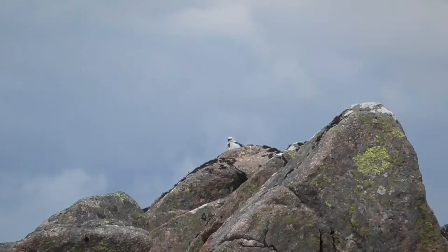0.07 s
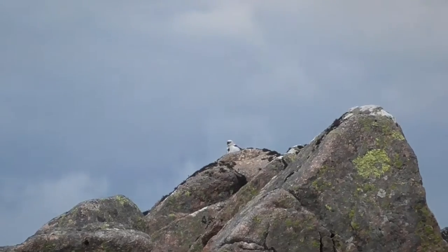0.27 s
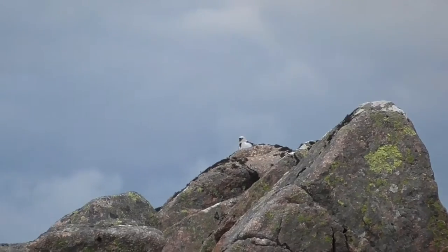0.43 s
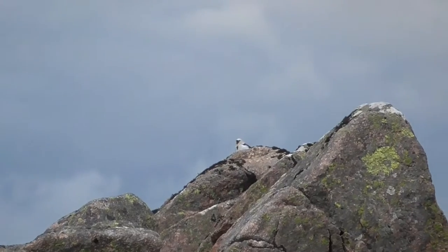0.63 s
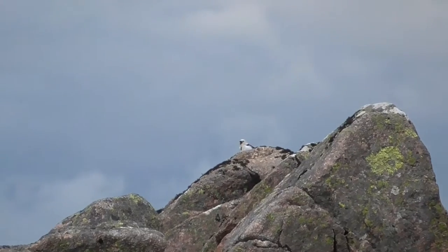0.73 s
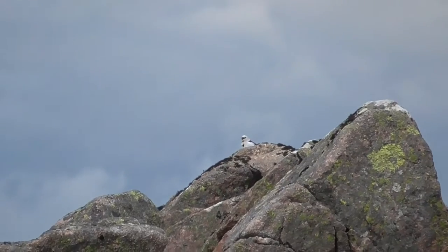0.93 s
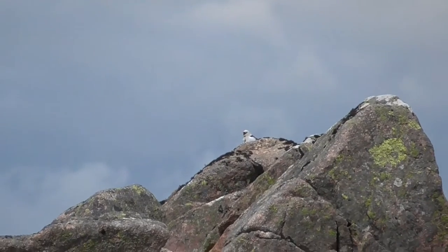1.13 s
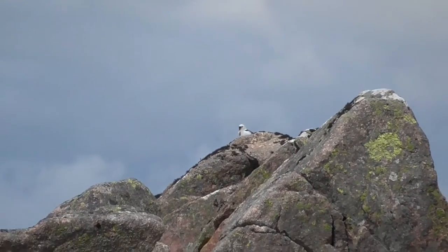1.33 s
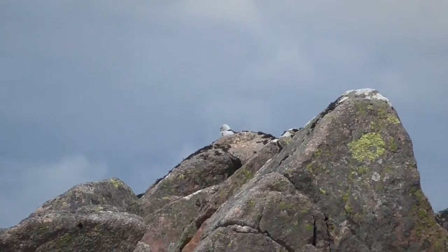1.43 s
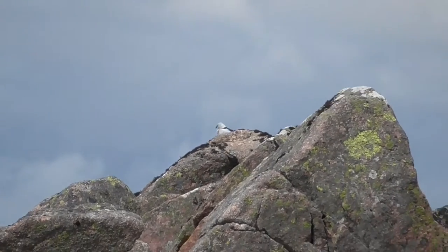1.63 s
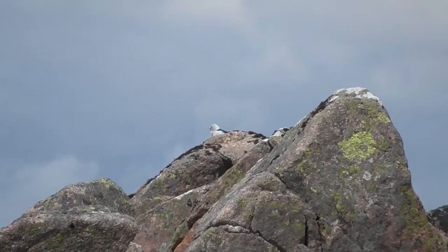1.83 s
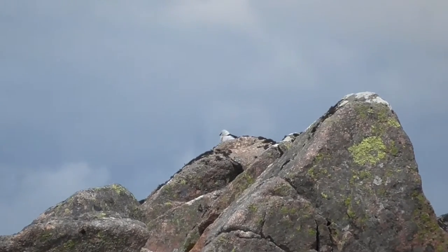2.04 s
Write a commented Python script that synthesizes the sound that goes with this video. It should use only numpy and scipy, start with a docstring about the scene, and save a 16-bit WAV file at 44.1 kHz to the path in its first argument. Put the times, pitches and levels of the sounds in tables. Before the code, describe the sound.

A small bird sings a quick run of high chirps, gliding whistles and scratchy trilled notes on an open mountain. Uneven wind gusts rumble and thump on the microphone throughout, with faint handling clicks early on.

```python
"""On a windy mountain, a snow bunting sings from a rock: quick chips, gliding whistles, slurs and
notes that open with a quaver. Its syrinx is a harmonic source, filtered by throat and beak, and the
rocks scatter a trace of the song. Turbulent gusts rumble and thump on the microphone, and the handled
camera clicks faintly, all over a steady hiss."""
import sys
import numpy as np
from scipy import signal
from scipy.fft import rfft, irfft
from scipy.io import wavfile
from scipy.ndimage import uniform_filter1d

SR = 44100
rng = np.random.default_rng(int(sys.argv[2]) if len(sys.argv) > 2 else 0)


def transcribe(u):
    """Save the signal u as a 16-bit wav file named by the first command-line argument.

    u: samples, shape (n,) or (channels, n), limited to [-1, 1]; the rate is SR.
    q: integer samples, one column per channel.
    """
    v = np.clip(np.atleast_2d(u).T, -1, 1)
    q = np.round(v * 32767).astype(np.int16)
    wavfile.write(sys.argv[1], SR, q)


N = 92610


def amp(db):
    """The decibel scale: 20 dB is a tenfold amplitude."""
    return 10 ** (np.asarray(db) / 20)


def unit(x):
    """Normalisation to an rms of 1."""
    return x / np.sqrt(np.mean(x ** 2) + 1e-20)


def add(mix, start, sound):
    """Superposition: a sound adds to the mix from its start [s]."""
    part = mix[max(round(start * SR), 0):][:len(sound)]
    part += sound[:len(part)]


def level_at(spectrum, hz):
    """Interpolation of a spectrum's level [dB] over log frequency."""
    f, db = np.transpose(spectrum)
    return np.interp(np.log(hz + 1), np.log(f + 1), db)


def noise(spectrum):
    """Spectral shaping of white noise, at an rms of 1."""
    gain = amp(level_at(spectrum, np.fft.rfftfreq(N, 1 / SR)))
    return unit(irfft(rfft(rng.standard_normal(N)) * gain, N))


def wander(rate_hz):
    """Random modulation: low-passed noise at an rms of 1."""
    f = np.fft.rfftfreq(N, 1 / SR)
    return unit(irfft(rfft(rng.standard_normal(N)) * np.exp(-(f / rate_hz) ** 2), N))


def edges(t, edge_s):
    """Quarter-sine tapers limit spectral splatter at both ends of a sound."""
    attack = np.sin(np.pi / 2 * np.clip(t / edge_s, 0, 1))
    release = np.sin(np.pi / 2 * np.clip((t[-1] - t) / edge_s, 0, 1))
    return attack * release


# Hiss spectra, in phase and in antiphase at the two ports (frequency [Hz], relative level [dB])
HISS_MID_SPECTRUM = [(100, 19.5), (1500, 11.5), (2500, 1), (5000, -3), (6000, -7.5), (7500, -3.5),
                     (11000, 0), (13000, -3.5), (15700, -2.5)]
HISS_SIDE_SPECTRUM = [(1000, -4), (2500, -11), (12000, 0.5), (15700, -13.5)]
def hiss():
    """Stationary noise: a weak antiphase part slightly decorrelates the channels."""
    mid = noise(HISS_MID_SPECTRUM)
    side = amp(-25.5) * noise(HISS_SIDE_SPECTRUM)
    return amp(-63) * np.array([mid + side, mid - side])


# Three bands of turbulence (frequency [Hz], relative level [dB])
RUMBLE_SPECTRUM = [(20, -26.5), (32, -20), (50, -18), (75, -9), (105, -4), (150, -9), (220, -18.5),
                   (600, -95)]
BUFFET_SPECTRUM = [(80, -64.5), (170, 2), (300, -5), (450, -13), (700, -33.5), (2500, -110)]
FLUTTER_SPECTRUM = [(200, -33.5), (380, -1.5), (520, -1), (750, -4.5), (1100, -16), (1450, -19.5),
                    (1750, -36.5), (2500, -36), (5000, -55.5)]
# Gust envelopes before capping and scaling (time [s], rumble [dB], buffet [dB], flutter [dB])
GUST_LEVELS = [(0.017, -36.5, -43, -59), (0.035, -34, -39, -42.5), (0.221, -37, -39, -48),
               (0.253, -22.5, -31, -47.5), (0.288, -47, -39, -45.5), (0.327, -25.5, -21.5, -37.5),
               (0.358, -35, -37.5, -46), (0.41, -31, -31, -51), (0.482, -40.5, -37.5, -48.5),
               (0.512, -21, -19, -27.5), (0.567, -18, -28, -48), (0.614, -30, -30.5, -52.5),
               (0.682, -44, -49, -58.5), (0.712, -38.5, -32.5, -49.5), (0.752, -33, -48.5, -65.5),
               (0.909, -65, -62, -67), (0.95, -23, -38, -54), (1.008, -21.5, -24, -53.5),
               (1.068, -51, -57.5, -62), (1.16, -50, -50, -58), (1.198, -30, -32.5, -49),
               (1.26, -41.5, -52, -61), (1.322, -46, -45, -52.5), (1.349, -29.5, -34.5, -51),
               (1.452, -28, -23.5, -44.5), (1.53, -38, -49, -60), (1.552, -55, -30.5, -41),
               (1.571, -24.5, -34, -50.5), (1.608, -54, -45, -55.5), (1.682, -30, -32, -46),
               (1.7, -33, -26, -43.5), (1.735, -30, -41.5, -47), (1.782, -34.5, -28, -47),
               (1.99, -33.5, -43.5, -54), (2.03, -38.5, -51, -56), (2.1, -32, -40.5, -53.5)]
def wind(lean_db=0.4):
    """Turbulent pressure on the microphone: gusts modulate three noise bands over a calm rumble."""
    times, rumble_db, buffet_db, flutter_db = np.transpose(GUST_LEVELS)
    t, lumps = np.arange(N) / SR, wander(73.6)

    def envelope(db, cap_db):
        return amp(np.minimum(np.interp(t, times, db), cap_db))

    rumble = np.hypot(amp(-1) * envelope(rumble_db, cap_db=-25), amp(-46.5))  # gust and calm powers add
    buffet = envelope(buffet_db, cap_db=-25) * unit(amp(5 * lumps))
    flutter = envelope(flutter_db, cap_db=-34) * unit(amp(4 * lumps))
    mid = rumble * noise(RUMBLE_SPECTRUM) + buffet * noise(BUFFET_SPECTRUM)
    mid += flutter * noise(FLUTTER_SPECTRUM) + eddy_thumps()
    side = amp(-18) * (rumble * noise(RUMBLE_SPECTRUM) + buffet * noise(BUFFET_SPECTRUM))
    side += amp(-24) * flutter * noise(FLUTTER_SPECTRUM)
    # The wind strikes the left port a little harder.
    return np.array([amp(lean_db) * (mid + side), amp(-lean_db) * (mid - side)])


# Overtones at the syrinx (harmonic number, relative level [dB])
HARMONICS = [(2, -13), (3, -14), (4, -17)]
# Resonance of throat and beak (frequency [Hz], gain [dB])
THROAT_RESPONSE = [(1800, -14), (2500, -9), (3000, -0.5), (3700, 3), (4500, -6), (5100, -15.5),
                   (6000, -27.5), (7500, -17), (9000, -18), (11200, -11), (12300, -21.5), (14000, -31)]
def syrinx(hz, envelope, main_hz, bright_db=0, jitter=0.004, shimmer_db=0):
    """Source and filter: a harmonic tone passes the throat, whose gain is normalised at main_hz."""
    phase = 2 * np.pi * np.cumsum(hz * (1 + jitter * wander(260)[:len(hz)])) / SR
    dulling_db = 10 * (np.arange(len(hz)) / SR / 0.11) ** 2  # overtones lose 10 dB by 0.11 s
    tone = amp(level_at(THROAT_RESPONSE, hz)) * np.sin(phase)
    for k, db in HARMONICS:
        gain = amp(db + bright_db - dulling_db + level_at(THROAT_RESPONSE, k * hz))
        tone += gain * (k * hz < SR / 2) * np.sin(k * phase)
    flicker_db = shimmer_db * wander(150)[:len(hz)]
    return np.sqrt(2) * envelope * amp(flicker_db - level_at(THROAT_RESPONSE, main_hz)) * tone


# Short arched notes (start [s], duration [s], first pitch [Hz], top pitch [Hz], last pitch [Hz],
# climb across the top [Hz], level [dB])
CHIP_NOTES = [(0.084, 0.013, 4300, 4440, 4500, 300, -59), (.099, 0.022, 3120, 3850, 2650, 250, -45),
              (0.538, 0.029, 2600, 3010, 3020, 105, -45), (0.68, 0.0084, 2870, 4360, 3100, 0, -66),
              (0.722, 0.028, 2280, 3090, 2750, 755, -40.5), (0.9594, 0.024, 2590, 3785, 2580, -5, -38),
              (0.982, 0.019, 3040, 4180, 2480, 92, -41.5), (1.0027, 0.01, 3000, 4460, 2300, -1, -50.5),
              (1.074, 0.026, 4220, 4520, 3870, 550, -47.5), (1.096, 0.0209, 3140, 3897, 2650, 100, -35),
              (1.1106, 0.025, 4160, 3690, 3530, -300, -48), (1.43, 0.026, 2490, 2990, 2790, 202, -43),
              (1.518, 0.015, 3600, 3600, 2960, 350, -41), (1.537, 0.024, 2320, 2920, 2480, 552, -43.5),
              (1.564, 0.018, 3400, 3610, 3050, 403, -38), (1.578, 0.015, 2960, 3930, 3030, 300, -40.5),
              (1.592, 0.011, 3150, 4390, 3460, -200, -44.5), (1.810, 0.021, 4000, 4300, 4650, 245, -61),
              (1.826, 0.025, 3230, 3730, 2520, 147, -50)]
def chips(scoop_s=0.00322, hook_s=0.00291, arch_db=8):
    """Rapid frequency sweeps: each chip scoops onto a tilted plateau and hooks away at the end."""
    out = np.zeros(N)
    for start, length, first_hz, top_hz, last_hz, climb_hz, db in CHIP_NOTES:
        t = np.arange(0, length, 1 / SR)
        progress = t / length
        plateau = top_hz + climb_hz * (progress - .5)
        scoop = (first_hz - plateau[0]) * np.exp(-(t / scoop_s) ** 1.53)
        hook = (last_hz - plateau[-1]) * np.exp(-((length - t) / hook_s) ** 1.68)
        hz = plateau + scoop + hook
        envelope = amp(db - arch_db * (2 * progress - 1) ** 2) * edges(t, 0.0045)
        add(out, start, syrinx(hz, envelope, top_hz, bright_db=-1.5, jitter=0.013, shimmer_db=1.6))
    return out


# Long gliding notes (start [s], duration [s], first pitch [Hz], held pitch [Hz], last pitch [Hz],
# slide time constant [s], level [dB], level tilt [dB], overtone gain [dB])
WHISTLE_NOTES = [(0.132, 0.081, 2340, 3236, 2675, 0.0092, -41.5, 8, -2),
                 (.752, .107, 3990, 3350, 3597, 0.031, -38.5, -5.5, 1),
                 (1.135, .1, 1706, 2650, 2394, 0.01, -46.5, 0, -1.5),
                 (1.873, 0.099, 1840, 2704, 2344, 0.017, -57, -12, -7)]
def whistles(arch_db=8):
    """Exponential relaxation: the pitch slides onto a linear drift as the level swells and falls."""
    out = np.zeros(N)
    for start, length, first_hz, held_hz, last_hz, slide_s, db, tilt_db, bright_db in WHISTLE_NOTES:
        t = np.arange(0, length, 1 / SR)
        progress = t / length
        hz = held_hz + (first_hz - held_hz) * np.exp(-t / slide_s) + (last_hz - held_hz) * progress
        level_db = db + tilt_db * (progress - .5) - arch_db * (2 * progress - 1) ** 2
        add(out, start, syrinx(hz, amp(level_db) * edges(t, 0.0071), held_hz, bright_db))
    return out


# Single eddies (time [s], frequency [Hz], half-width [s], peak level [dB])
EDDIES = [(.325, 176, 0.0035, -8.5), (.506, 173, .005, -12), (.5122, 270, 0.0035, -5),
          (.534, 207, 0.0044, -14), (0.972, 220, 0.0022, -18.5), (1.008, 127, 0.0094, -19.5),
          (1.848, 160, 0.0027, -13.5)]
def eddy_thumps():
    """Pressure pulses: each eddy striking the microphone is a brief low-frequency wave packet."""
    out, t = np.zeros(N), np.arange(N) / SR
    for at, hz, width, db in EDDIES:
        out += amp(db) * np.cos(2 * np.pi * hz * (t - at)) / (1 + ((t - at) / width) ** 2) ** 2
    return out


# Notes that open with a quaver (end of quaver [s], hold [s], pitch [Hz], last pitch [Hz], level [dB],
# level change over the hold [dB], quaver duration [s], swing [Hz], exponent of the fall)
QUAVER_NOTES = [(0.4527, 0.072, 3653, 3263, -31, -5.5, 0.045, 590, 1.17),
                (1.3328, 0.087, 3550, 3224, -34, -6, 0.048, 850, 2.1),
                (2.091, .075, 3600, 3250, -46, 10, 0.038, 725, 3.4)]
def quavers(rate_hz=108.5, settle_s=0.027, sag_hz=418, rise_db=13.5, dip_db=18.5):
    """Coupled frequency and amplitude modulation: scratchy downstrokes merge into a falling whistle."""
    out = np.zeros(N)
    for at, hold, pitch_hz, last_hz, db, change_db, quaver_s, swing_hz, bend in QUAVER_NOTES:
        t = np.arange(-quaver_s, hold, 1 / SR)
        progress = np.clip(t / hold, 0, 1)
        early = np.maximum(-t / quaver_s, 0)  # 1 at the onset, 0 once the quaver ends
        depth = 1 / (1 + np.exp((t + settle_s / 2) / (settle_s / 3.8)))
        phase = 2 * np.pi * rate_hz * t
        swing = np.cos(phase) - .25 * np.sin(2 * phase)  # skewed: rise and fall differ in speed
        hz = last_hz + (pitch_hz - last_hz) * (1 - progress) ** bend
        hz += depth * (swing_hz * swing - early * sag_hz)
        hz *= 1 + .04 * depth * wander(900)[:len(t)]
        closing = (1 - np.cos(phase - 1.3)) / 2  # loudest on the downstroke
        level_db = db + change_db * progress ** 2 - rise_db * early ** 2
        level_db -= dip_db * depth * (.5 + early) * closing ** 2
        level_db += 2 * depth * wander(900)[:len(t)]
        add(out, at - quaver_s, syrinx(hz, amp(level_db) * edges(t + quaver_s, 0.0071), pitch_hz))
    return out


# Dull knock of the case and bright tick (frequency [Hz], relative level [dB])
KNOCK_SPECTRUM = [(300, 30), (700, -30), (1080, 34), (1500, 1), (2000, -27), (4000, -25), (8000, -78)]
TICK_SPECTRUM = [(1000, 6.5), (3500, 9.5), (6500, -7.5), (9000, 2), (11200, 7), (15000, -9)]
# Clicks of the handled camera (time [s], decay time constant [s], knock [dB], tick [dB])
CASE_CLICKS = [(0.5125, 0.0053, -22, -51), (0.5143, 0.003, -34, -51), (.529, 0.0044, -26.5, -39.5),
               (0.5424, .0013, -50, -45), (0.5516, 0.0023, -25, -66)]
def handling():
    """Damped impacts: a knock and a tick decay exponentially; the tick differs between the ports."""
    out, t = np.zeros((2, N)), np.arange(SR // 20) / SR
    for start, decay_s, knock_db, tick_db in CASE_CLICKS:
        knock = amp(knock_db) * noise(KNOCK_SPECTRUM)[:len(t)]
        tick = amp(tick_db) * noise(TICK_SPECTRUM)[:len(t)]
        side = amp(tick_db - 17) * noise(TICK_SPECTRUM)[:len(t)]
        envelope = np.exp(-t / decay_s) * edges(t, 0.00017)
        add(out[0], start, (knock + tick + side) * envelope)
        add(out[1], start, (knock + tick - side) * envelope)
    return out


# Contours of three slurred notes (time [s], pitch [Hz], level [dB])
FLICK_CONTOUR = [(.6915, 3700, -50), (.695, 4150, -43), (.698, 5650, -53), (.701, 4400, -60),
                 (.7035, 4100, -41), (.708, 3200, -41), (.718, 3400, -38), (.723, 2700, -55)]
LISP_CONTOUR = [(.921, 4550, -66), (.936, 4580, -50), (.953, 4460, -42.5), (.957, 4000, -43.5),
                (.9615, 4600, -35)]
DOWNSLUR_CONTOUR = [(1.604, 6480, -72), (1.62, 5380, -66.5), (1.634, 4880, -48), (1.642, 4280, -46),
                    (1.655, 3840, -47.5), (1.69, 3640, -48.5), (1.725, 3490, -50), (1.746, 3320, -58)]
def slurs():
    """Glissando: each note follows its contour of pitch and level with unbroken phase."""
    out = np.zeros(N)
    notes = [(FLICK_CONTOUR, 4.5, 0.01), (LISP_CONTOUR, 3.5, 0.0097), (DOWNSLUR_CONTOUR, -2.5, 0.0025)]
    for contour, bright_db, jitter in notes:
        times, pitches, db = np.transpose(contour)
        t = np.arange(times[0], times[-1], 1 / SR)
        hz = uniform_filter1d(np.interp(t, times, pitches), size=64)
        envelope = amp(np.interp(t, times, db)) * edges(t - times[0], 0.0045)
        add(out, times[0], syrinx(hz, envelope, hz, bright_db, jitter))
    return out


def rock_scatter(song, db=-27, decay_s=0.012):
    """Diffuse reflection from the rocks: convolution with a short, decaying noise."""
    t = np.arange(SR // 4) / SR
    tail = rng.standard_normal(len(t)) * np.exp(-t / decay_s)
    return amp(db) * signal.fftconvolve(song, tail / np.linalg.norm(tail))[:N]


def scene():
    """Linear superposition: the song, equal in both channels, is heard straight ahead."""
    background = hiss()
    song = chips() + whistles() + slurs() + quavers()
    return background + song + rock_scatter(song) + wind() + handling()


def record(dry, low_cut_hz=40, cutoff_hz=15700):
    """Band limiting: a high-pass and a low-pass filter, with tapered ends."""
    highpass = signal.butter(2, low_cut_hz, "highpass", fs=SR, output="sos")
    lowpass = signal.firwin(511, cutoff_hz, window=("kaiser", 9), fs=SR)
    tapered = signal.sosfilt(highpass, dry) * edges(np.arange(N) / SR, .003)
    return signal.oaconvolve(tapered, lowpass[None], "same")


dry = scene()
out = record(dry)
transcribe(out)
```